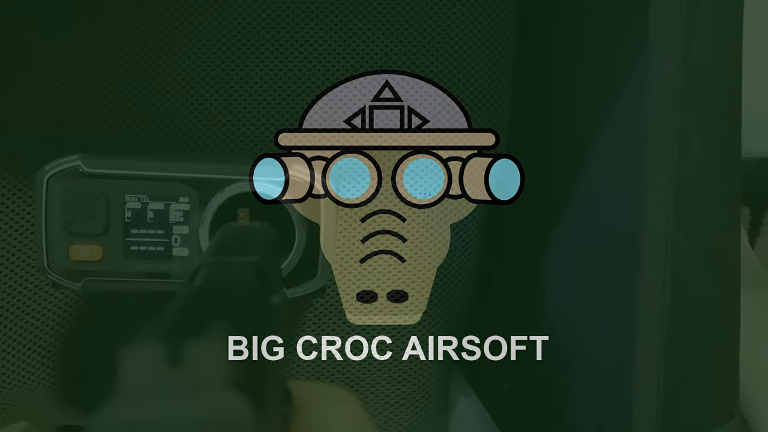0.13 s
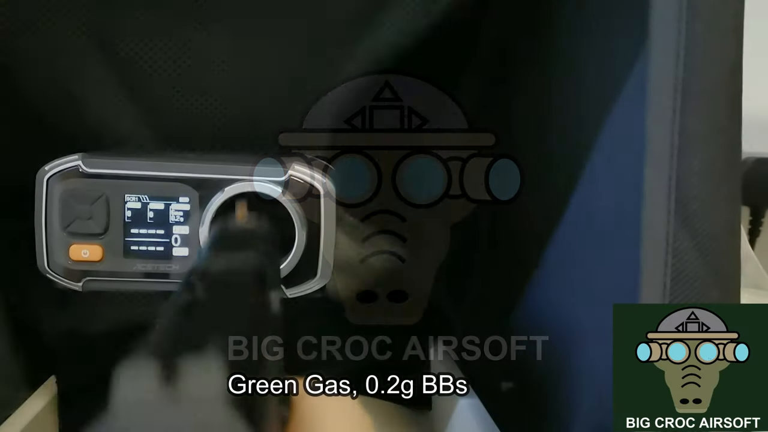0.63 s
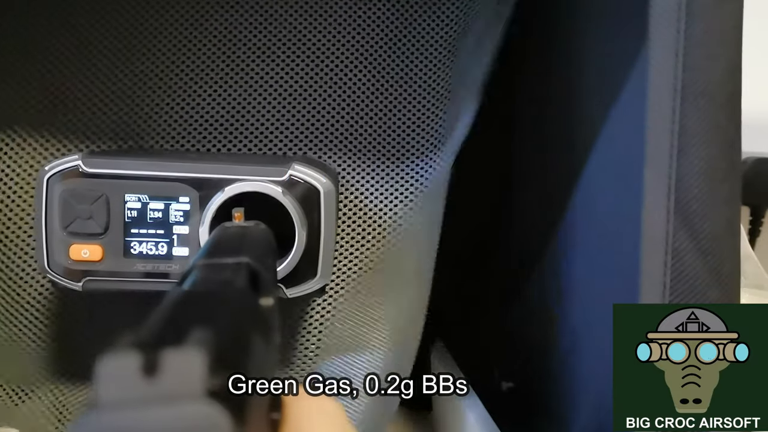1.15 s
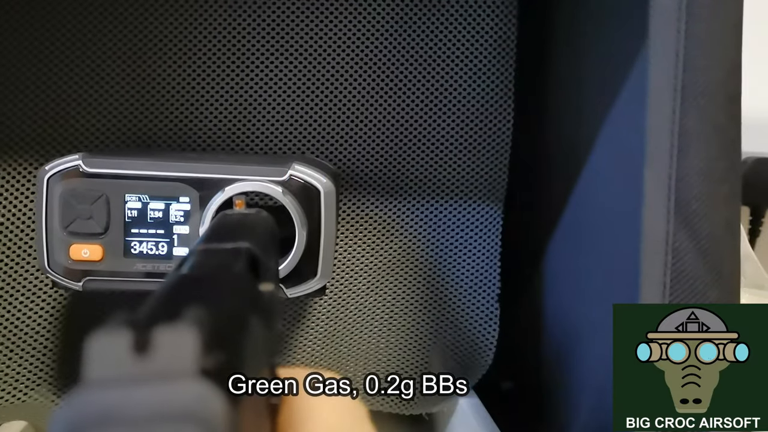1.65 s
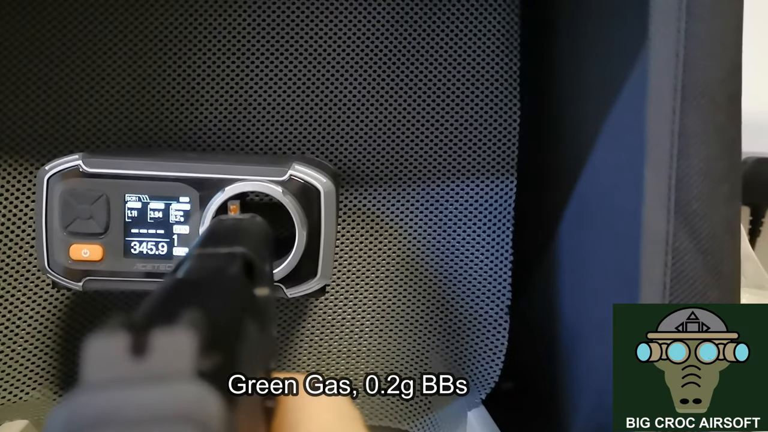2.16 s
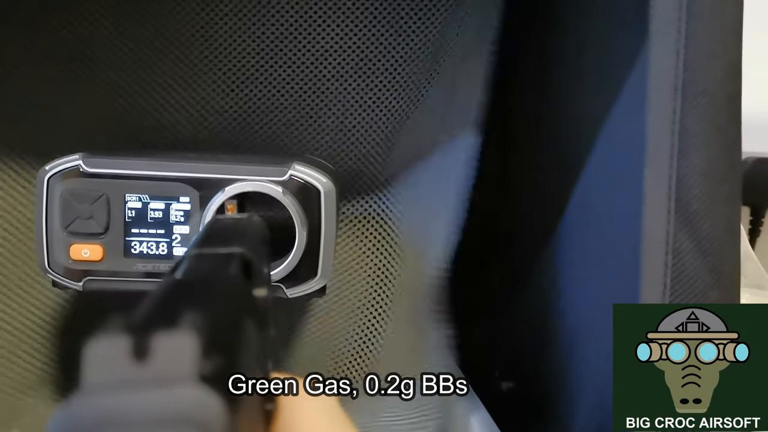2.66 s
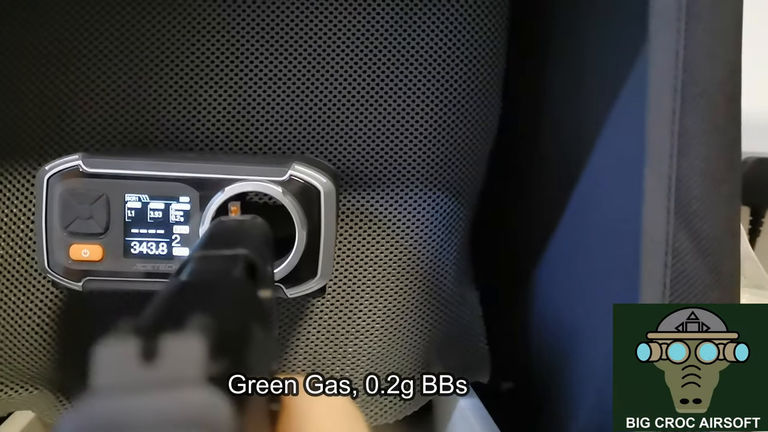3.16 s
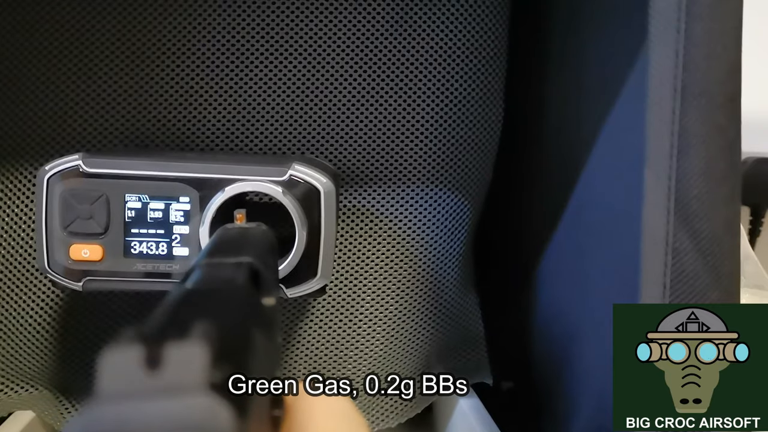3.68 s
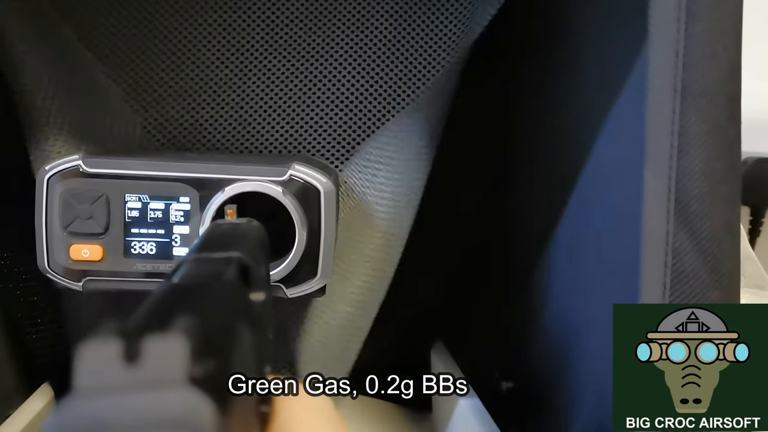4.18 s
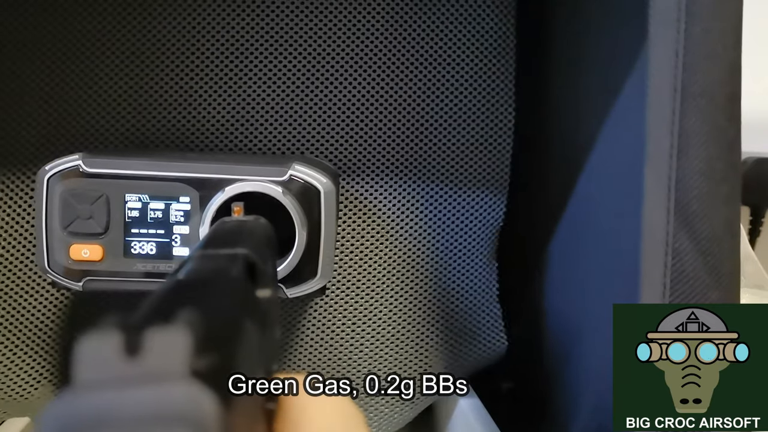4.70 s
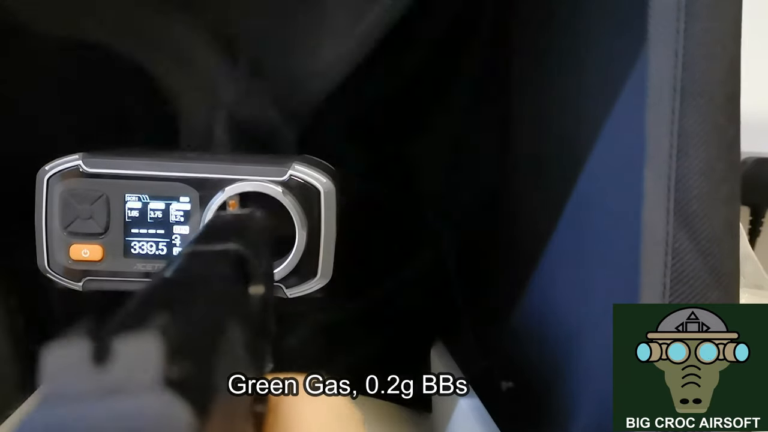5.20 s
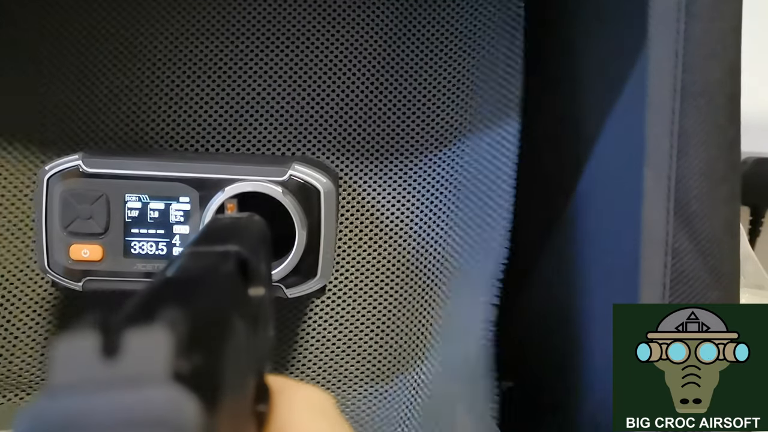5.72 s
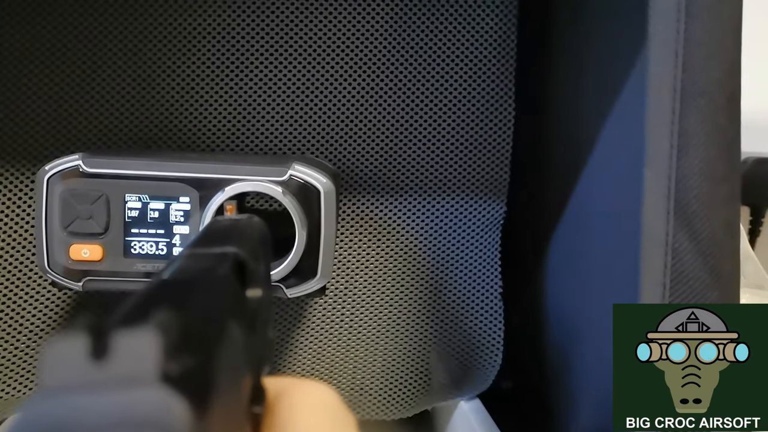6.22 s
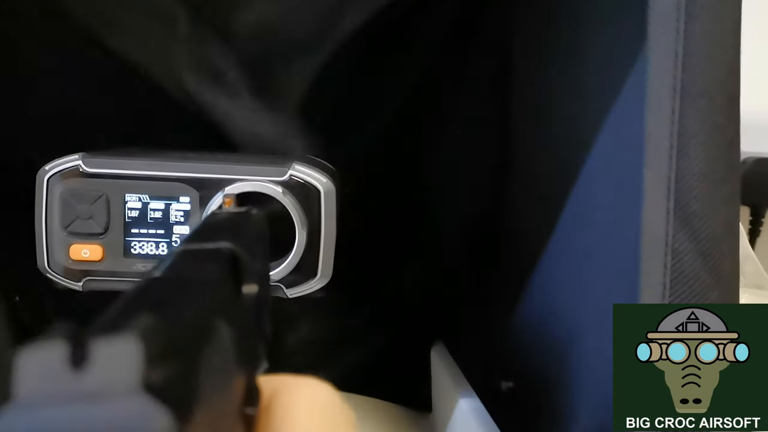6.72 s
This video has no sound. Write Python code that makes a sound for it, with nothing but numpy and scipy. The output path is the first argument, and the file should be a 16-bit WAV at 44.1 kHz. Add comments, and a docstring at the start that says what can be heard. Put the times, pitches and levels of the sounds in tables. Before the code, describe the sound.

Close stereo microphone in a small room. A gas-powered airsoft pistol fires five single shots about a second and a half apart, each a loud dry crack of gas, pellet hitting cloth net and slide clacking, with a slightly overloaded low thump. A small trigger click follows each of the first four, then spent plastic pellets tick and bounce across the hard floor. Soft motor hum and room noise lie underneath.

```python
"""Small room, stereo microphone close by: a gas pistol fires five single shots into a cloth net.
Each shot is shaped noise for gas, pellet strike and slide, a low rumble of the overloaded microphone,
and decaying modes for the thump. Trigger clicks follow the first four; then spent pellets bounce, as
rattling noise plus floor modes. Diffuse noise answers from the room; the net twice bumps dully.
Wavering motor sines hum softly over shaped room noise; both fade in at the start."""
import sys
import numpy as np
from scipy import signal
from scipy.fft import rfft, irfft, next_fast_len
from scipy.io import wavfile
from scipy.ndimage import uniform_filter1d

SR = 44100
rng = np.random.default_rng(int(sys.argv[2]) if len(sys.argv) > 2 else 0)


def to_linear_factor(level_db):
    """Convert decibel levels (scalar or array-like) to linear amplitude factors."""
    exponent = np.asarray(level_db, float) / 20
    return 10 ** exponent


def inscribe(sig):
    """Save sig as 16-bit PCM at rate SR to the path in sys.argv[1].

    A 1-D sig is mono; a 2-D sig holds one channel per row.
    Samples are clipped to [-1, 1] before scaling.
    """
    pcm = np.round(np.clip(np.atleast_2d(sig).T, -1, 1) * 32767)
    wavfile.write(sys.argv[1], SR, pcm.astype(np.int16))


N = 302085

# room noise: [f/Hz, relative density/dB per Hz]
AIR_SPECTRUM = [(12, -44.5), (22, -1.5), (60, -5), (120, -5), (165, -7), (270, -9.5), (420, -16),
                (490, -16), (1050, -22.5), (1800, -25), (4300, -31), (6500, -37.5), (8000, -36),
                (12000, -68.5), (15600, -100)]
# left-right likeness of diffuse sound: [f/Hz, likeness 0-1]
DIFFUSE_LIKENESS = [(60, 0.64), (240, 1), (950, 0.87), (3770, 0.44), (15000, 0.1)]
# microphone housing resonances: [f/Hz, width/Hz, boost/dB]
HOUSING_BANDS = [(617.5, 68, 3.5), (1430, 400, 4.5), (3120, 400, 2), (5680, 420, 6.5), (7730, 910, 5.5)]
# motor lines, before beat, wavering and fade: [f/Hz, level/dB]
HUM_LINES = [(48.3, -64), (73.5, -70), (96.8, -75), (138, -70.5), (193.8, -63.5), (242, -73.5),
             (301.5, -76), (339, -78.5), (397, -77)]
# shots: [t/s, strength/dB]
SHOTS = [(0.6729, -2), (2.2726, -4), (3.7628, -5.5), (5.1995, -8), (6.7116, -6)]
# starts in one firing cycle: valve leaks, gas blast, pellet strikes the net, slide runs back,
# last gas, slide slams home: [t after shot/ms]
CYCLE_STARTS_MS = [-5, .1, 8.0, 12, 20, 36.3]
# the same six steps: [level re shot/dB, rise/ms, t60/ms, shuts after/ms, ringing share 0-1,
# ringing f/Hz, ringing width/Hz]
CYCLE_STEPS = [(-24, 5, 230, 6, 0.1, 6500, 3800), (-1.5, 1.8, 56, 40, .3, 6000, 3500),
               (-5.5, 0.32, 15, 20, 0.6, 3400, 1100), (-10, 1.8, 190, 6.8, 0.2, 7400, 1400),
               (-17.5, 1.7, 200, 30, 0.3, 7600, 980), (-14, 0.71, 170, 7, 0.7, 6000, 2200)]
# gas noise: [f/Hz, relative density/dB per Hz]
GAS_SPECTRUM = [(240, -26.5), (400, -6), (949, -5), (1990, -3), (2550, -4), (2880, -1), (3370, -5),
                (3810, 1), (5110, -7.5), (7510, -3.5), (9920, -30.5), (14600, -27.5), (16000, -47.5)]
# left-right likeness of direct sound: [f/Hz, likeness 0-1]
DIRECT_LIKENESS = [(500, 0.07), (1200, 0.26), (3000, 0.7), (5000, 0.68), (7000, 0.1), (12000, .05)]
# microphone overload rumble: [f/Hz, relative density/dB per Hz]
OVERLOAD_SPECTRUM = [(25, -11), (60, -8), (150, 13.5), (400, -0.5), (800, -16.5), (1400, -32.5)]
# enclosure modes: [f/Hz, level/dB, t60/s]
THUMP_MODES = [(34.49, -10.5, 0.04), (91.4, -15, 0.099), (186, -10.5, 0.037), (360, -8.5, 0.03),
               (449, -20, .05), (517, -13.5, 0.042), (650, -10.5, 0.037)]
# room decay, before each sound's decay scale: [f/Hz, t60/s]
ROOM_DECAY = [(100, 0.13), (400, 0.17), (1400, 0.35), (3000, 0.38), (6000, .36), (8000, .38), (10500, 0.24),
              (15000, 0.32)]
# room's answer to a shot: [f/Hz, relative density/dB per Hz]
SHOT_TAIL_SPECTRUM = [(120, -19), (250, 2), (430, 1), (800, -11.5), (1300, -6.5), (2020, -12.5),
                      (4650, -11), (6600, -5.5), (7700, -8), (8400, -15.5), (10200, -28), (14900, -33.5)]
# trigger springs back: [t/s, peak/dB]
RESETS = [(0.825, -23.5), (2.4349, -26.5), (3.924, -30), (5.3575, -29)]
# trigger and frame resonances: [f/Hz, width/Hz, level/dB]
CLANG_BANDS = [(2700, 640, -3), (4500, 410, 5), (5700, 380, 6), (7000, 220, 13)]
# pellet bounces: [t/s, peak before panning/dB, floor knock re rattle/dB, left minus right/dB]
BOUNCES = [(1.136, -45.5, 11, 8), (1.265, -23.5, -3, -1), (1.329, -41, -17, 4), (1.371, -31.5, -11, -2.0),
           (1.373, -28, -16, 1), (1.414, -34, -6, -0.5), (2.867, -49, -2, 0.0), (2.915, -23.5, -8, -1.5),
           (2.992, -28, -24, -1), (3.022, -32.5, -19, 1), (3.084, -38, -20, -1), (3.105, -44, -19, 0.5),
           (3.132, -45, -9, -1.0), (4.138, -50.5, 7, 3), (4.214, -21, -3, -1), (4.292, -25, -11.5, 0),
           (4.401, -25.5, -12, -2), (4.481, -36, -7, 0), (4.615, -33, -19, 0), (4.658, -41.5, -18, 1),
           (4.692, -38.5, -12, -2), (4.741, -42.5, -7, -1), (4.771, -47.5, -9, 1), (5.862, -27.5, -8, -2),
           (5.942, -32.5, -7, 0), (5.986, -28.5, -10, 2), (6.032, -41, -4, 0)]
# pellet rattle: [f/Hz, relative density/dB per Hz]
RATTLE_SPECTRUM = [(290, -85), (500, -32.5), (893, -27.5), (1510, 5), (1950, -5.5), (2610, 3), (4800, 1),
                   (6800, 7), (9920, -13.5), (14500, -22.5), (16000, -19)]
# floor modes: [f/Hz, level/dB, t60/s]
FLOOR_MODES = [(906, -4.5, 0.031), (1520, 6, 0.0052), (2710, 6.5, 0.011), (3290, 5.5, 0.0082),
               (4490, 9, 0.0083), (6650, 10, 0.0056)]
# room's answer to a bounce: [f/Hz, relative density/dB per Hz]
BOUNCE_TAIL_SPECTRUM = [(530, -17), (900, 5), (1550, -2), (2860, -1), (7580, 1.5), (10200, -19),
                        (14700, -23), (15400, -29), (16000, -53)]
# net swings back against its frame: [t/s, level/dB, top of band f/Hz]
NET_THUDS = [(2.771, -54, 870), (3.15, -59, 60)]

AIR_DB = -62.5
FADE_S, FADE_POWER = 0.55, 1.86
BEAT_S, BEAT_PEAK_S, BEAT_SHARE = 1.037, 1.79, 0.85
THUMP_MS, SLAM_MS, SLAM_DB = 2.3, 37.5, -15.5  # after the shot; slam level re thump
SHOT_LEAD_S = 0.01  # each shot's buffer starts this long before the shot
SHOT_ROOM_DB, SHOT_ROOM_FOLLOWS = -20.5, 0.35  # answer to a 0 dB shot; dB per dB of strength
SHOT_ROOM_LAG_S = 0.0028
REPEAT_HZ = 1200  # below this the room answers every shot the same way
BOUNCE_LAG_S = 0.0004  # after the listed time
BOUNCE_ROOM_LAG_S, BOUNCE_ROOM_DB = 0.001202, -21  # after the bounce; re its listed peak
EDGE_HZ = 15250


def evened(x):
    """Scales to rms 1."""
    return x / np.sqrt(np.mean(x ** 2) + 1e-20)


def peaked(x):
    """Scales to peak 1."""
    return x / abs(x).max()


def read(points, hz):
    """Reads a table on a log-frequency axis."""
    f, value = np.transpose(points)
    return np.interp(np.log(hz + 1), np.log(f + 1), value)


def add(mix, s, sound):
    """Mixes a stereo sound in at time s, cut at the end."""
    part = mix[:, round(s * SR):][:, :sound.shape[1]]
    part += sound[:, :part.shape[1]]


def sides(pan_db):
    """Left and right gains, pan_db apart."""
    return to_linear_factor([[pan_db / 2], [-pan_db / 2]])


def hiss(shape, size, likeness):
    """Stereo noise of a given magnitude spectrum; the ports share a part of it."""
    hz = np.fft.rfftfreq(size, 1 / SR)
    a, b = rfft(rng.standard_normal((2, size)))
    same = np.clip(read(likeness, hz), 0, 1)
    right = same * a + np.sqrt(1 - same ** 2) * b
    return evened(irfft(np.array([a, right]) * shape(hz), size))


def burst(ms, rise_ms, t60_ms, stop_ms):
    """Soft rise, exponential fall, and a quick shut at 14 dB/ms."""
    ms = np.maximum(ms, 0)
    fall_db = -60 * ms / t60_ms - 14 * np.maximum(ms - stop_ms, 0)
    return np.minimum(ms / rise_ms, 1) ** 2 * to_linear_factor(fall_db)


def ring(modes, t, spread_db):
    """Decaying modes, each a little different in strength and pitch at each port."""
    out = 0
    for hz, db, t60_s in modes:
        level, pitch = rng.standard_normal((2, 2, 1))
        decay = to_linear_factor(db + spread_db * level - 60 * t / t60_s)
        out = out + decay * np.sin(2 * np.pi * hz * (1 + 0.03 * pitch) * t)
    return out


def housing(hz):
    """Bands that the microphone housing raises in diffuse sound, dB."""
    return sum(db / (1 + (2 * (hz - f) / width) ** 2) for f, width, db in HOUSING_BANDS)


def air():
    """Smooth room noise, near mono in the bass."""
    noise = hiss(lambda hz: to_linear_factor(read(AIR_SPECTRUM, hz) + housing(hz)), next_fast_len(N), DIFFUSE_LIKENESS)
    return to_linear_factor(AIR_DB) * noise[:, :N]


def waver():
    """Slow random curve of rms 1."""
    return evened(uniform_filter1d(uniform_filter1d(rng.standard_normal(N), 3000), 3000))


def hum():
    """Motor lines waver in level and pitch; two motors nearly in step make the lowest beat."""
    t, out = np.arange(N) / SR, np.zeros(N)
    beat = abs(1 + BEAT_SHARE * np.exp(2j * np.pi * (t - BEAT_PEAK_S) / BEAT_S))
    for k, (hz, db) in enumerate(HUM_LINES):
        level, drift = waver(), waver()
        size = beat * to_linear_factor(db + 1.2 * level) if k == 0 else to_linear_factor(db + 3.1 * level)
        phase = 2 * np.pi * np.cumsum(hz * (1 + 0.007 * drift)) / SR
        out += np.sqrt(2) * size * np.sin(phase)
    return out


def firing_cycle(ms):
    """Gas and ringing noise bursts through the six steps of one firing cycle."""
    out = np.zeros((2, len(ms)))
    for at_ms, step in zip(CYCLE_STARTS_MS, CYCLE_STEPS):
        db, rise_ms, t60_ms, stop_ms, share, ring_hz, width_hz = step
        gas = hiss(lambda hz: to_linear_factor(read(GAS_SPECTRUM, hz)), len(ms), DIRECT_LIKENESS)
        ringing = hiss(lambda hz: 1 / (1 + (2 * (hz - ring_hz) / width_hz) ** 4), len(ms), DIRECT_LIKENESS)
        share = np.clip(share, 0, 1)
        blend = np.sqrt(1 - share) * gas + np.sqrt(share) * ringing
        out += to_linear_factor(db) * burst(ms - at_ms, rise_ms, t60_ms, stop_ms) * blend
    return out


def overload_rumble(ms):
    """Low noise of the overloaded microphone, mostly separate on each side."""
    noise = hiss(lambda hz: to_linear_factor(read(OVERLOAD_SPECTRUM, hz)), len(ms), [(30, 0.2), (200, 0.2), (800, 0.1)])
    return to_linear_factor(-14) * noise * burst(ms - 2.5, 4.5, 110, 55)


def thump(ms):
    """The pressure wave rings the enclosure's modes; the slide slamming home rings them again."""
    out = ring(THUMP_MODES, np.maximum(ms - THUMP_MS, 0) / 1000, 2.5)
    out += to_linear_factor(SLAM_DB) * ring(THUMP_MODES, np.maximum(ms - SLAM_MS, 0) / 1000, 3)
    return uniform_filter1d(out, size=30)  # the push lasts most of a millisecond


def shot(db):
    """Firing cycle, overload rumble and thump, scaled to the shot's strength."""
    ms = np.arange(8192) * 1000 / SR - SHOT_LEAD_S * 1000
    return to_linear_factor(db) * (firing_cycle(ms) + overload_rumble(ms) + thump(ms))


def room(spectrum, decay_scale):
    """Dense echoes, each band dying at its own speed; a gate-like fade steepens the fall after 0.2 s."""
    echoes = hiss(lambda hz: to_linear_factor(read(spectrum, hz) + housing(hz)), 20480, DIFFUSE_LIKENESS)
    hz, t, z = signal.stft(echoes, SR, nperseg=256)
    gate_db = -110 * np.maximum(t - 0.2, 0)
    fall_db = -60 * t / (decay_scale * read(ROOM_DECAY, hz)[:, None]) + gate_db
    tail = signal.istft(z * to_linear_factor(fall_db), SR, nperseg=256)[1]
    return tail * np.minimum(np.arange(tail.shape[1]) / (0.0033 * SR), 1)  # echoes build up


def clang(hz):
    """Resonances of the trigger and frame."""
    return sum(to_linear_factor(db) / np.hypot(1, 2 * (hz - f) / width) ** 2 for f, width, db in CLANG_BANDS)


def reset(db):
    """The trigger springs back: a short metal click of resonant noise."""
    ms = np.arange(2048) * 1000 / SR
    click = hiss(lambda hz: clang(hz) + 1.1 * to_linear_factor(read(SHOT_TAIL_SPECTRUM, hz)) * (hz > 1200),
                 len(ms), DIRECT_LIKENESS)
    return to_linear_factor(db) * peaked(click * burst(ms, 0.25, 30, 30))


def bounce(db, knock_db, pan_db):
    """A hard plastic pellet on a hard floor: a few milliseconds of rattle and a short knock."""
    ms = np.arange(2048) * 1000 / SR
    rattle = hiss(lambda hz: to_linear_factor(read(RATTLE_SPECTRUM, hz)), len(ms), DIRECT_LIKENESS)
    rattle = rattle * burst(ms, 0.9, 41, 6.2)
    knock = ring(FLOOR_MODES, np.maximum(ms - 0.3, 0) / 1000, 4.0)
    knock = to_linear_factor(knock_db) * knock * np.minimum(ms / 2.4, 1)
    return to_linear_factor(db) * sides(pan_db) * peaked(rattle + knock)


def net_thud(db, top_hz):
    """A soft, dull bump of cloth: low noise, rising more slowly the lower its band."""
    ms = np.arange(8192) * 1000 / SR
    bump = hiss(lambda hz: hz / (top_hz / 3 + hz) / (1 + (hz / top_hz) ** 2), len(ms), DIFFUSE_LIKENESS)
    return to_linear_factor(db) * bump * burst(ms, 3600 / top_hz, 230, 150)


def scene():
    """Shots, clicks, bounces and net in the room, over the background fading in."""
    mix = np.zeros((2, N))
    low = signal.butter(2, REPEAT_HZ, fs=SR)
    shared_bass = signal.filtfilt(*low, room(SHOT_TAIL_SPECTRUM, 1.0))
    for s, db in SHOTS:
        add(mix, s - SHOT_LEAD_S, shot(db))
        fresh = room(SHOT_TAIL_SPECTRUM, 1.243)
        tail = shared_bass + fresh - signal.filtfilt(*low, fresh)
        add(mix, s + SHOT_ROOM_LAG_S, to_linear_factor(SHOT_ROOM_DB + SHOT_ROOM_FOLLOWS * db) * tail)
    for s, db in RESETS:
        add(mix, s, reset(db))
    for s, db, knock_db, pan_db in BOUNCES:
        start_s = s + BOUNCE_LAG_S
        add(mix, start_s, bounce(db, knock_db, pan_db))
        add(mix, start_s + BOUNCE_ROOM_LAG_S, to_linear_factor(db + BOUNCE_ROOM_DB) * room(BOUNCE_TAIL_SPECTRUM, 0.78))
    for s, db, top_hz in NET_THUDS:
        add(mix, s, net_thud(db, top_hz))
    fade = np.minimum(np.arange(N) / SR / FADE_S, 1) ** FADE_POWER
    return mix + fade * (air() + hum())


def low_pass(x):
    """Removes everything above the highest recorded frequency."""
    return signal.sosfilt(signal.butter(12, 16490, fs=SR, output="sos"), x)


def record(dry):
    """Gain control pulls down after each shot and recovers; peaks are rounded off; treble is cut."""
    power = uniform_filter1d((dry ** 2).mean(0), 400, origin=199)  # looks back
    power_db = 10 * np.log10(abs(power) + 1e-12)
    fall_db = np.arange(N) * 40.0 / SR  # the held peak falls at 40 dB/s
    held_db = np.maximum.accumulate(power_db + fall_db) - fall_db
    over_db = np.maximum(held_db + 54.0, 0)
    ducked = dry / to_linear_factor(0.04 * uniform_filter1d(over_db, 300))
    ceiling = 0.8
    rounded = ceiling * np.tanh(ducked / ceiling)
    edge = signal.firwin(127, EDGE_HZ, window=("kaiser", 4), fs=SR)
    finished = signal.oaconvolve(rounded, edge[None], "same", axes=1)
    return low_pass(finished)


dry = scene()
out = record(dry)
inscribe(out)
```